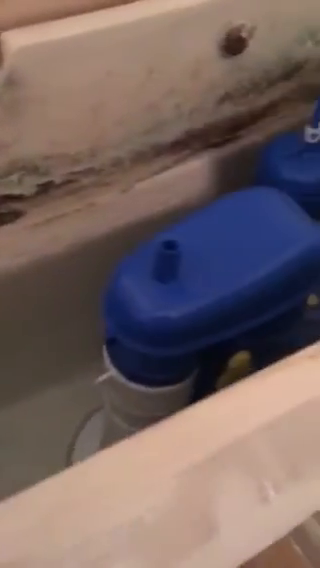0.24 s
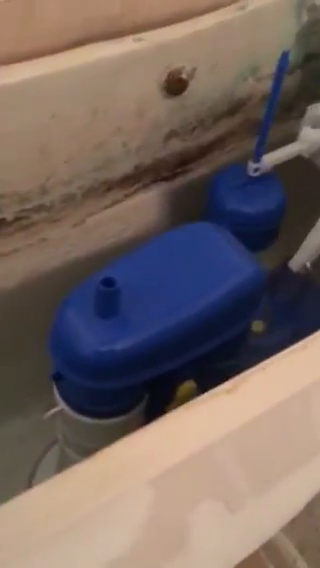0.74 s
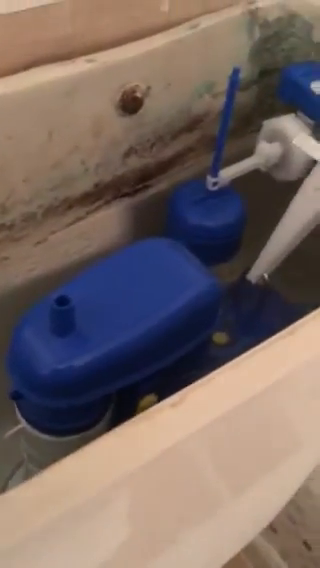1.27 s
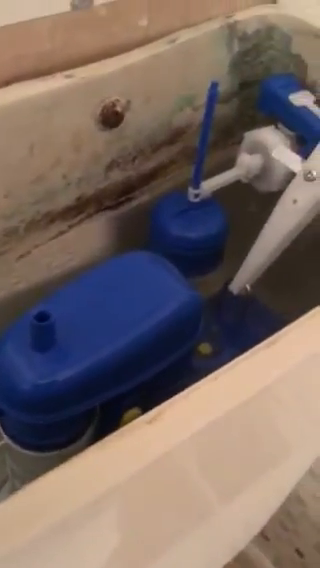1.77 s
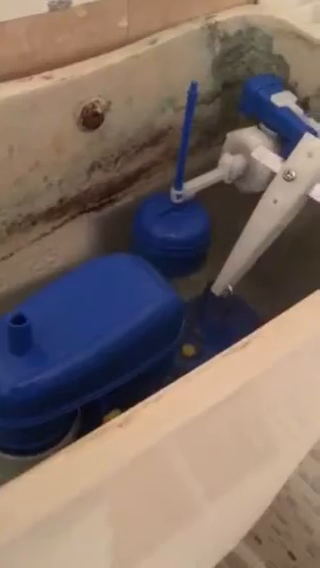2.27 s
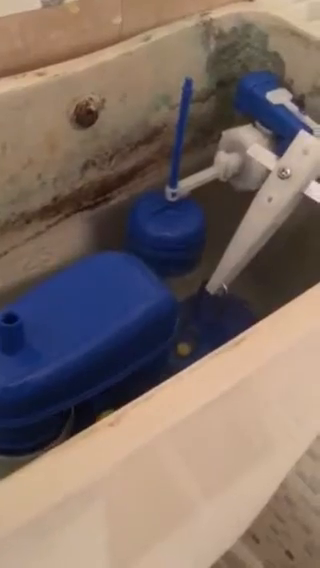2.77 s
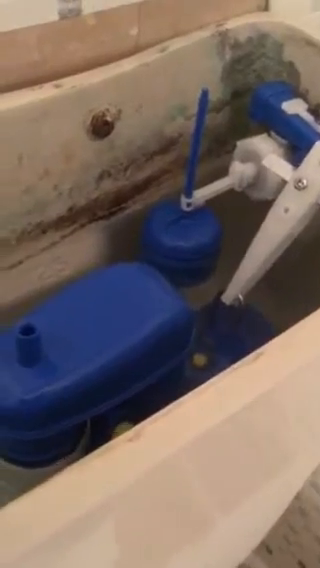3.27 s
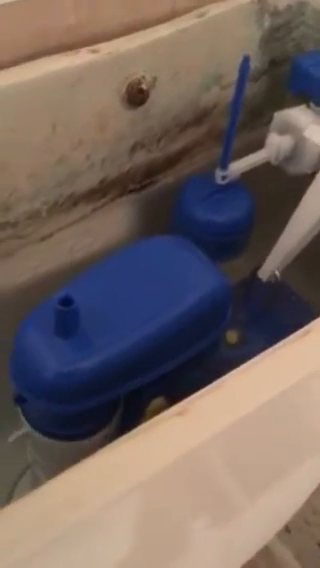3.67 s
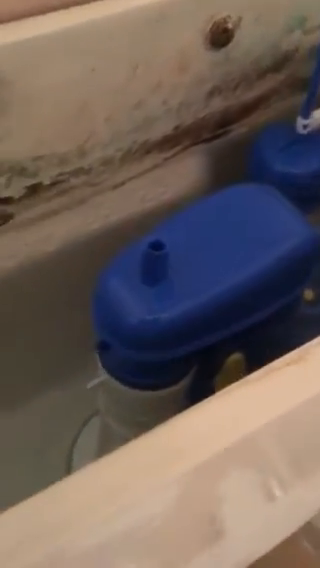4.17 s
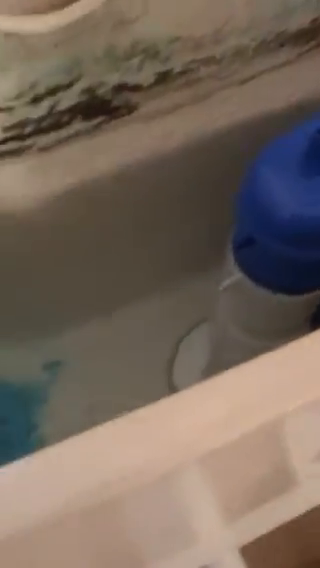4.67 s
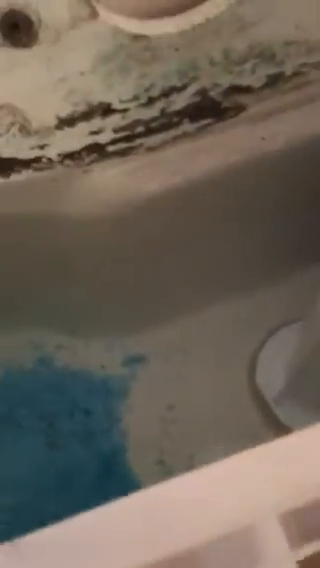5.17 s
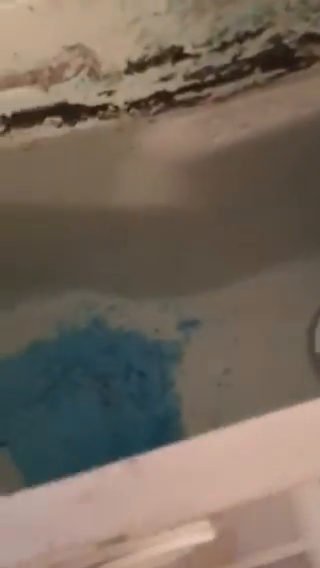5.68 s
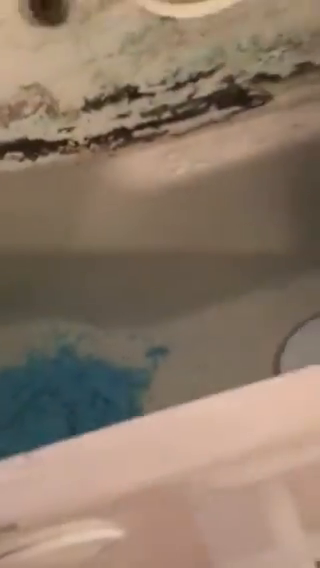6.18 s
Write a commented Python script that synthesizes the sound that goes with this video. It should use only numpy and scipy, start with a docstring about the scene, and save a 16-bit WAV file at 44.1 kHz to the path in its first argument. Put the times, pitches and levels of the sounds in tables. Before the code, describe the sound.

A toilet cistern is refilling in a small tiled bathroom, heard close above the open tank. From 0 to about 4.1 seconds a steady jet of water hisses through the fill valve, its noise flickering in the treble, while pipe and tank sing with a hollow, breathy whistle strongest around 1.5 kHz. Low uneven gurgling lies beneath, gradually fading. Bright pops snap irregularly on top, the sharpest near 0.75 and 0.96 seconds, with fine crackle, spatter and a few short ringing bubbles; the crackle grows livelier around 3.4 seconds. Between 4.2 and 4.4 the valve closes and the rush drops sharply. A faint trickle, little plops and ticking foam continue, thinning out by about 5.6 seconds. The end, to roughly 6.3 seconds, is almost still: only the soft low hum and slightly wavering rumble of the house.

```python
"""A small tiled bathroom, where a toilet cistern refills. The jet in the fill valve hisses, as noise in flickering
bands, and sets pipe and tank singing, as noise through narrow resonances. Entrained air bursts at the surface in
bright pops of noise, a fine crackle and a few ringing bubbles with rising pitch. The valve closes, the last foam
crackles away and the low hum of the house, a shaped noise, remains."""
import sys
import numpy as np
from scipy import signal
from scipy.fft import rfft, irfft, next_fast_len
from scipy.io import wavfile

SR = 44100
rng = np.random.default_rng(int(sys.argv[2]) if len(sys.argv) > 2 else 0)


def unload_audio(sound):
    """Save the sound as a 16-bit wav file, at the path given as the first command line argument."""
    columns = np.transpose(np.atleast_2d(sound))
    # keep every value between -1 and 1, then stretch to whole-number steps
    steps = np.round(np.clip(columns, -1, 1) * 32767)
    wavfile.write(sys.argv[1], SR, steps.astype(np.int16))


N = 283563

# liveliness of the foam bursting at the surface: (time [s], crackle level [dB])
FOAM_LEVEL = [(0, -38), (1, -43), (2.3, -40.5), (3.4, -33.5), (4.12, -36.5), (4.3, -53), (4.6, -56),
              (5.05, -50), (5.3, -54.5), (5.55, -66), (6.1, -86)]


def from_db(db):
    """Gain of a level in dB."""
    return 10 ** (np.asarray(db) / 20)


def rms_one(x):
    """Scaled to rms 1."""
    return x / np.sqrt(np.mean(x ** 2) + 1e-20)


def in_time(rows):
    """A (time [s], value) curve at every sample."""
    return np.interp(np.arange(N) / SR, *np.transpose(rows))


def drift(rate_hz):
    """Slow chance: noise through two equal one-pole low-passes with this corner, spread 1."""
    step = 20   # samples between the slow values
    r = np.exp(-2 * np.pi * rate_hz * step / SR)
    white = rng.standard_normal(N // step + 4002)
    slow = signal.lfilter([1], [1, -2 * r, r * r], white)[4000:]   # skip the settling
    return np.interp(np.arange(N) / step, np.arange(len(slow)), rms_one(slow))


def resonate(x, hz, width_hz):
    """Two-pole resonance, gain 1 on top."""
    r = np.exp(-np.pi * max(width_hz, 2) / SR)
    top = (1 - r * r) / 2
    return signal.lfilter([top, 0, -top], [1, -2 * r * np.cos(2 * np.pi * hz / SR), r * r], x)


def peaks(x, table):
    """Resonances of (pitch [Hz], width [Hz], added gain) on top of the flat path."""
    return x + sum(gain * resonate(x, hz, width) for hz, width, gain in table)


def butter(x, hz, kind="low"):
    """Second-order Butterworth filter."""
    return signal.sosfilt(signal.butter(2, hz, kind, fs=SR, output="sos"), x)


def coloured(spectrum):
    """Noise with a spectrum of (frequency [Hz], relative level [dB]) points; rms 1."""
    size = next_fast_len(N)
    hz, db = np.transpose(spectrum)
    bins_hz = np.arange(size // 2 + 1) * SR / size
    shape = from_db(np.interp(np.log(bins_hz + 1), np.log(hz), db))
    return rms_one(irfft(rfft(rng.standard_normal(size)) * shape, size)[:N])


def echo(x, t60_s):
    """Hard ceramic or tiled walls: a dense tail of dying noise."""
    t = np.arange(round(.3 * SR)) / SR
    tail = rng.standard_normal(len(t)) * from_db(-60 * t / t60_s) * (t > .002)
    return signal.fftconvolve(x, tail / np.sqrt(np.sum(tail ** 2)))[:N]


def house():
    """The hum of the house: shaped noise whose low rumble swells as the valve shuts and booms in the room."""
    # (frequency [Hz], relative level per Hz [dB])
    hum = [(18, -56), (30, -24), (60, -9.5), (90, -2.5), (115, -3), (169, 0.5), (237, -4), (400, -14),
           (520, -19), (1000, -21), (1640, -27.5), (3000, -33.5), (11500, -41.5), (15600, -46)]
    # level of the low rumble: (time [s], level [dB])
    rumble = [(0, -40.5), (4.05, -43.5), (4.3, -38.5), (4.6, -44), (4.75, -47.5), (5.2, -41.5),
              (5.6, -42.5), (5.85, -46), (6.3, -43.5)]
    # low resonances of the room: (pitch [Hz], width [Hz], added gain)
    room_boom = [(89, 8.6, 0.53), (155.4, 8.4, 0.67), (216.4, 11.5, 0.61)]
    split_hz, hum_db = 380, -40
    lows = peaks(butter(coloured(hum), split_hz), room_boom)
    highs = butter(coloured(hum), split_hz, "high")
    rumble_db = in_time(rumble) + 2.3 * drift(10.8)
    return from_db(rumble_db) * lows + from_db(hum_db) * highs   # only the rumble swells


def crackle(level_db, clump_db, per_s, low_hz, high_hz):
    """Countless tiny bubbles burst in clumps, each ringing some cycles at its own pitch."""
    born = rng.random(N) < per_s * from_db(clump_db * drift(20)) / SR
    strengths = from_db(3.5 * np.minimum(rng.exponential(1, N), 4))
    bursts = strengths * rng.choice([-1, 1], N) * born + 1e-18
    pitches, dealt = np.geomspace(low_hz, high_hz, 20), rng.integers(0, 20, N)
    rings = 0
    for k, hz in enumerate(pitches):
        # twice through the resonance: a soft start, a narrow ring
        ring = resonate(resonate(bursts * (dealt == k), hz, 0.078 * hz), hz, 0.25 * hz)
        rings = rings + ring * (hz / 8000) ** -.3
    return from_db(level_db) * rms_one(rings)


def spatter():
    """Droplets spatter on the water, in the rush and from the last trickle, and excite hollow tank resonances."""
    # (time [s], level [dB]), before the hollow resonances
    trickle = [(0, -43), (2, -44), (4.1, -45.5), (4.3, -57.5), (4.7, -57.5), (5.1, -60), (5.35, -63.5),
               (5.6, -70), (6, -95)]
    # tank resonances: (pitch [Hz], width [Hz], added gain)
    hollow = [(1130, 330, 4.3), (2250, 390, 2.7)]
    drops = crackle(in_time(trickle), clump_db=4.0, per_s=2200, low_hz=1020, high_hz=6090)
    return peaks(drops, hollow)


def bubbles():
    """A larger bubble splashes, rings at its pitch and rises slightly; a short ring goes with a strong splash."""
    # (time [s], relative peak level [dB], starting pitch [Hz], 60 dB decay of the ring [ms], at least 5)
    ringing_bubbles = [(0.03, -20, 1200, 40), (0.075, -24.5, 557, 27), (0.117, -23, 2200, 28),
                       (0.179, -21, 1020, 30), (0.181, -23.5, 2790, 48), (0.558, -19.5, 2210, 40),
                       (0.7503, -13, 2580, 16), (0.7515, -21, 3550, 18), (0.92, -23, 670, 31),
                       (0.925, -22, 1010, 24), (0.961, -24, 3600, 15), (1.152, -25, 4460, 21),
                       (1.343, -26, 4380, 28), (1.408, -18.5, 960, 11), (1.4228, -18, 2220, 30),
                       (1.538, -21.5, 2500, 11), (1.68, -21.5, 3550, 22), (1.738, -16, 2500, 8),
                       (2.71, -23, 4480, 18), (2.823, -21, 3540, 29), (3.143, -17.5, 2530, 4.9),
                       (3.3515, -18, 2290, 26), (3.484, -24.5, 3450, 89), (3.553, -17, 2310, 26),
                       (3.652, -20, 2330, 40), (3.8776, -15, 2320, 21), (4.0663, -18.5, 2950, 16),
                       (4.2857, -31.5, 2230, 30), (4.3252, -43, 2250, 20), (4.35, -51, 5000, 14),
                       (4.3915, -36, 2160, 18), (4.394, -38, 4120, 18), (4.4389, -51, 2280, 24),
                       (4.486, -43, 2250, 22), (4.501, -42, 1640, 18), (4.5511, -42, 2250, 25),
                       (4.597, -34.5, 1170, 9), (4.644, -39, 1580, 27), (4.705, -32, 1580, 14),
                       (4.787, -40, 1850, 22), (4.797, -46, 5700, 18), (4.8215, -35, 4200, 26),
                       (4.848, -35, 4070, 20), (4.866, -35.5, 1660, 14), (4.869, -42, 4080, 16),
                       (4.8915, -39, 1280, 28), (4.9317, -39, 3920, 21), (4.95, -28.5, 2430, 6),
                       (4.9757, -40, 3680, 20), (4.998, -40, 2680, 18), (5.0464, -38, 1870, 22),
                       (5.068, -41, 2600, 20), (5.101, -32.5, 3790, 20), (5.117, -36, 1280, 19),
                       (5.282, -28, 2030, 7.4), (5.284, -34, 3240, 13)]
    out, t = np.zeros(N + 3000), np.arange(3000) / SR
    tear = rng.standard_normal((len(ringing_bubbles), 3000))
    for (s, db, hz, t60_ms), noise in zip(ringing_bubbles, tear):
        ring = np.sin(2 * np.pi * hz * t * (1 + 1.78 * t)) * from_db(-60000 * t / max(t60_ms, 5))
        splash = resonate(resonate(noise * np.exp(-t / 0.0056), 1.3 * hz, 0.7 * hz), hz, 0.4 * hz)
        bubble = ring * (t60_ms / 35) ** 0.6 + 0.5 * splash / np.abs(splash).max()
        bubble = bubble * (1 - np.exp(-t / 0.0011))   # soft start
        i = round(s * SR)
        out[i:i + 3000] += from_db(db + 3.5) * bubble / np.abs(bubble).max()
    return out[:N]


def small_pops(start_s, stop_s, count):
    """Smaller pops come at random, as loud as the foam is lively."""
    over_foam_db, spread_db = 15.5, 4.5
    low_hz, high_hz = 5500, 12700
    when, size, pitch, share = rng.random((count, 4)).T
    s = start_s + when * (stop_s - start_s)
    db = np.interp(s, *np.transpose(FOAM_LEVEL)) + over_foam_db + spread_db * (2 * size - 1)
    return list(zip(s, db, low_hz + (high_hz - low_hz) * pitch, share))


def pops():
    """A film tears: a burst of noise swells and dies, partly broad, partly ringing at the bubble's size."""
    # the loud surface pops: (time [s], relative peak level [dB], pitch [Hz], broad share [0-1])
    loud_pops = [(0.166, -15, 9300, 0.3), (0.1935, -18, 7350, 0.5), (0.208, -9.5, 7800, 0),
                 (0.3023, -8, 9200, 0), (0.3533, -9.5, 9150, 0.3), (0.378, -12, 11100, 0),
                 (0.4176, -11, 6800, 0.97), (0.4624, -10, 6250, 0.3), (0.4798, -12.5, 9630, 0.1),
                 (0.5247, -11, 8360, 0), (0.558, -11, 6700, 0.8), (0.5951, -11, 9000, 0.3),
                 (0.67, -11.5, 9100, 0.8), (0.7513, 0.5, 8500, 0.7), (0.7715, -14, 7000, 0),
                 (0.8053, -12, 9300, 0.9), (0.8186, -10, 6530, 0.4), (0.898, -7.5, 8000, 0.7),
                 (0.9525, -5.5, 9700, 0.5), (0.9624, -2.5, 9900, 0.96), (1.0146, -14, 7500, 0.4),
                 (1.024, -12, 6260, 0.4), (1.113, -10.5, 8400, 0.4), (1.2307, -12, 10300, 0.8),
                 (1.314, -8.5, 9200, 0.6), (1.3604, -10.5, 11300, 0), (1.3759, -14, 11800, 0.15),
                 (1.7195, -13, 10700, 0.6), (1.77, -17, 6300, 0), (1.8229, -11, 11200, 0.2),
                 (1.8632, -15.5, 7150, 0.5), (1.9371, -12.5, 6100, 0.2), (2.0587, -9, 10000, 0.4),
                 (2.0806, -6.5, 12000, 0.25), (2.1864, -17, 9570, 0.1), (2.2672, -17, 11700, 0.1),
                 (2.326, -16, 7150, 0), (2.4843, -19, 9570, 0.1), (2.525, -12.5, 10000, 0.9),
                 (2.581, -13, 8900, 0.32), (2.608, -13, 9500, 0.3), (2.641, -7, 9700, 0.8),
                 (2.6535, -9, 10800, 0.7), (2.8873, -12, 5300, 0.05), (2.9238, -14, 10000, 0.2),
                 (2.945, -14, 11100, 0.2), (2.992, -14, 6190, 0.6), (3.051, -11.5, 9500, 0.5),
                 (3.062, -13, 9100, 0.6), (3.1134, -9, 9700, 0.4), (3.1189, -7, 10000, 1),
                 (3.1259, -9, 11300, 1), (3.1477, -9, 11000, 0.8), (3.2455, -14, 10100, 0.5),
                 (3.2845, -11, 11300, 0.3), (3.3438, -15, 8980, 0.4), (3.3677, -18, 11000, 0),
                 (3.4685, -16, 6510, 0.3), (3.5205, -10, 9000, 0.1), (3.5678, -13, 9060, 0.5),
                 (3.596, -10.5, 6630, 0.1), (3.6288, -6, 11300, 0.7), (3.6713, -9, 9800, 0.3),
                 (3.757, -14, 9550, 0.14), (3.8077, -11.5, 10800, 0), (3.8243, -15, 11000, 0.1),
                 (3.8785, -5, 8600, 0.6), (3.94, -11.5, 4950, 0.4), (4.0377, -16, 6150, 0.4),
                 (4.067, -9.5, 9350, 0.5), (4.0878, -4.5, 10800, 0.4), (4.16, -15, 9200, 0.3),
                 (4.1935, -15, 7300, 0.8), (4.2473, -22, 9100, 0.39), (4.2993, -17, 12300, 0),
                 (4.3416, -22, 11300, 0.6), (4.3721, -24, 6640, 0.5), (4.392, -22, 7300, 0.3),
                 (4.3968, -18, 5500, 0.2), (4.4763, -25, 6500, 0.7), (4.4968, -21, 11800, 0.24),
                 (4.5272, -22, 11600, 0.3), (4.556, -29, 8540, 0.5), (4.5771, -29, 11700, 0.5),
                 (4.617, -17, 7200, 0.9), (4.665, -23, 11700, 0), (4.7057, -16.5, 6860, 1),
                 (4.715, -25, 12200, 0), (4.7886, -26, 9350, 0.8), (4.7956, -25, 11400, 0.4),
                 (4.841, -19, 12700, 0.4), (4.855, -24, 12000, 0), (4.8924, -29, 7200, 0.6),
                 (4.924, -29, 10500, 0.5), (4.9398, -28, 7300, 0.63), (4.9517, -24, 4870, 0.6),
                 (4.9772, -21, 11700, 0.4), (5.015, -21, 4970, 0.6), (5.0235, -22.5, 6040, 0.4),
                 (5.0465, -22, 10700, 0.6), (5.053, -24, 10600, 0.47), (5.07, -22, 11300, 0.1),
                 (5.0964, -24, 10900, 0), (5.12, -28, 9000, 1), (5.1543, -27, 13000, 0.2),
                 (5.2236, -30, 11400, 0), (5.2401, -22.5, 6100, 0.2), (5.2514, -24, 6500, 0.3),
                 (5.285, -16.5, 5200, 0.9), (5.2965, -23, 10600, 0.55), (5.3665, -20, 11300, 0.55),
                 (5.3788, -36, 12800, 0.65), (5.4714, -22.5, 11000, 0.5), (5.6112, -34, 7100, 0.6)]
    rows = loud_pops + small_pops(0, 4.3, 90) + small_pops(4.3, 5.35, 40)
    rise_s, fall_s = 0.0014, 0.001
    skirt_s, skirt_db = 0.0056, -9   # a weaker noise skirt before and after each pop's peak
    out, t = np.zeros(N + 900), np.arange(900) / SR - .007   # time from the loudest moment
    swell = np.where(t < 0, np.exp(-(t / rise_s) ** 2), np.exp(-np.abs(t) / fall_s))
    skirt = np.exp(-np.abs(t) / skirt_s) * np.minimum(1, (t - t[0]) / 0.0032)
    swell = swell + from_db(skirt_db) * skirt
    for (s, db, hz, share), burst in zip(rows, swell * rng.standard_normal((len(rows), 900))):
        broad = rms_one(resonate(resonate(burst, 4800, 4900), 11300, 8000))
        ringing = rms_one(resonate(resonate(burst, hz, 0.093 * hz), hz, 0.3 * hz))
        share = np.clip(share, 0, 1)
        pop = np.sqrt(1 - share) * ringing + np.sqrt(share) * broad
        i = max(round((s + t[0]) * SR), 0)
        out[i:i + 900] += from_db(db - 7.5) * pop / np.abs(pop).max()
    return out[:N]


def surface():
    """All the bursts at the water surface, with the short echo of the tank."""
    tank_t60_s, tank_wet_db = 0.07, -10
    foam = crackle(in_time(FOAM_LEVEL), clump_db=4.5, per_s=1500, low_hz=1492, high_hz=12000)
    bursts = pops() + bubbles() + foam + spatter()
    bursts = butter(bursts, 12800)   # the bursts are duller at the very top
    return bursts + from_db(tank_wet_db) * echo(bursts, tank_t60_s)


def gurgle(flow_db):
    """Uneven low splashing in the shallow water, fading as the water deepens."""
    start_db, sag_db_per_s = -39.5, 3.5
    hz, width_hz = 530, 156
    white = rng.standard_normal(N)
    splash = rms_one(resonate(resonate(white, hz, width_hz), hz, 2 * width_hz))
    level_db = start_db + flow_db - sag_db_per_s * np.arange(N) / SR + 3.0 * drift(2.0)
    return from_db(level_db) * splash


def spray(flow_db):
    """Hiss of the jet: smooth below; above, scattering droplets make each band flicker, partly together."""
    # (frequency [Hz], relative level per Hz [dB])
    hiss_spectrum = [(150, -58), (250, -2), (406, 6), (583, -8.5), (810, -4.5), (1480, 3), (1760, -2.5),
                     (2210, 8.5), (2720, -8), (3520, -3.5), (4810, -14.5), (11200, -17), (15600, -25.5)]
    full_flow_db, follows = -30.5, 0.88   # share of the flow's swing in dB
    room_t60_s, room_wet_db = 0.3, -5   # the bathroom answers the hiss
    edges_hz, together = [2600, 4600, 7500, 11000, 17000], drift(30)
    hiss = butter(coloured(hiss_spectrum), edges_hz[0])
    for low, high in zip(edges_hz, edges_hz[1:]):
        droplets = butter(coloured(hiss_spectrum), [low, high], "band")
        hiss = hiss + from_db(2.2 * together + 2.2 * drift(52)) * droplets
    hiss = from_db(full_flow_db + follows * flow_db) * hiss
    return hiss + from_db(room_wet_db) * echo(hiss, room_t60_s)


def singing(flow_db):
    """Jet turbulence excites each resonance of pipe and tank; neighbours get unrelated noise and waver a little."""
    # pitches of the resonances: [Hz]
    mode_hz = [154, 178, 216, 261, 292, 317, 403, 430, 490, 647, 671, 704, 909, 965, 1095, 1212, 1281, 1360,
               1410, 1462, 1505, 1575, 1646, 1850, 1910, 2187, 2368, 2910, 3560, 3700, 4000]
    # the same resonances in the same order: (width [Hz], relative level [dB])
    mode_shape = [(8.8, -1.5), (17.9, -9.5), (8.8, -5), (10, -14.5), (16.1, -4.5), (13, 2.5), (15.3, 1),
                  (14, -6), (10.9, -8), (10.2, -8), (14.1, -7), (17.4, -6), (12.9, -9.5), (70, -18),
                  (84, -7), (30.6, -6.5), (35.7, -4.5), (38.2, -4.5), (22, -13), (24.2, 4), (23.4, 4),
                  (43.3, -4), (24.2, -2), (49, -8), (42.3, -5), (45.4, -12), (27.6, -8), (40, -12.5),
                  (60.4, -13), (60.4, -19.5), (262, -18.5)]
    full_flow_db, waver_db = -25, 0.1   # each resonance swells and fades by itself
    foot = 2.6   # width of a resonance's foot over that of its top
    white = rng.standard_normal((3, N))
    modes = 0
    for k, (hz, (width, db)) in enumerate(zip(mode_hz, mode_shape)):
        mode = resonate(resonate(white[k % 3], hz, width), hz, foot * width)
        modes = modes + from_db(db + waver_db * drift(4.2)) * mode
    return from_db(full_flow_db + flow_db + 0.38 * drift(38.0)) * rms_one(modes)


def scene():
    """The hum of the house behind, the bursting surface and the jet in front."""
    # water through the valve, full, then closing to a trickle that dies: (time [s], level re full flow [dB])
    flow = [(0, 1.5), (4.05, 0), (4.15, -2.5), (4.22, -3.5), (4.28, -15.5), (4.36, -27.5), (4.7, -32),
            (5.4, -45), (6.1, -65)]
    # treble resonances that colour the jet and the bursts: (pitch [Hz], width [Hz], added gain)
    treble = [(3940, 220, 0.24), (6520, 110, 0.48), (7300, 130, 0.8), (9350, 380, 0.7), (11300, 1600, 0.55)]
    flow_db = in_time(flow)
    jet = singing(flow_db) + spray(flow_db) + gurgle(flow_db)
    return (peaks(jet + surface(), treble) + house())[None]


def record(dry):
    """A steep elliptic low-pass cuts the top."""
    cutoff_hz = 15720
    return signal.sosfilt(signal.ellip(10, .5, 60, cutoff_hz, fs=SR, output="sos"), dry)


dry = scene()
out = record(dry)
unload_audio(out)
```